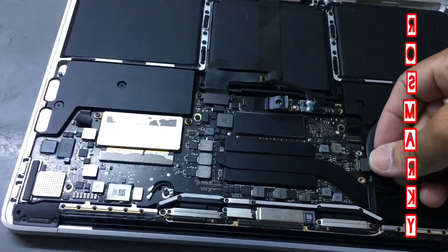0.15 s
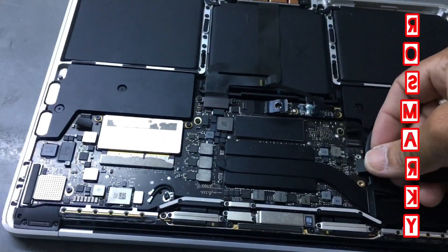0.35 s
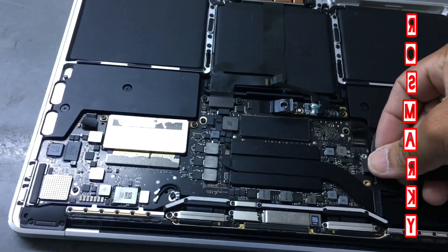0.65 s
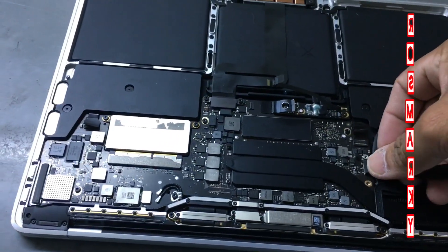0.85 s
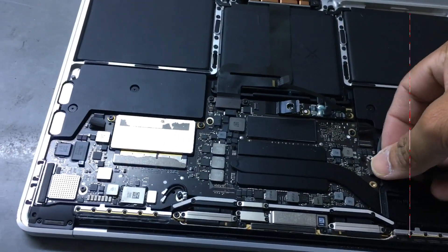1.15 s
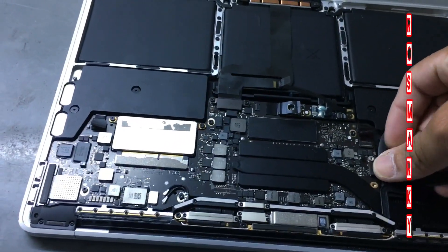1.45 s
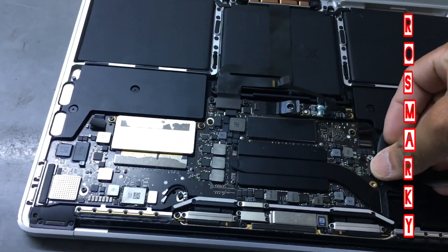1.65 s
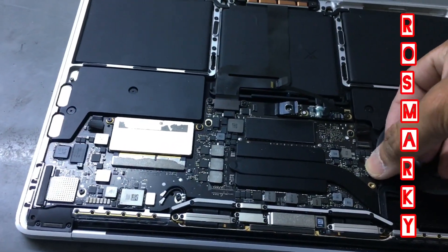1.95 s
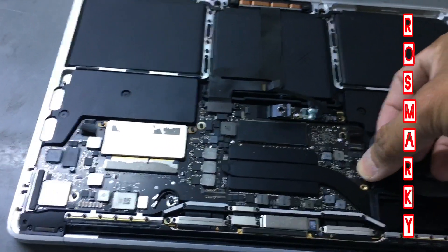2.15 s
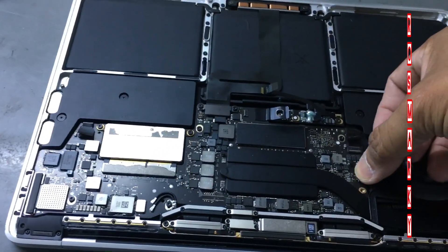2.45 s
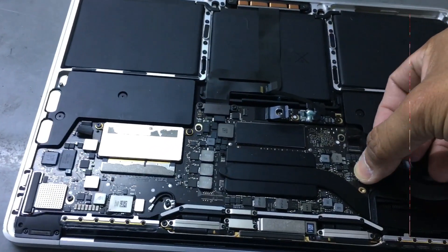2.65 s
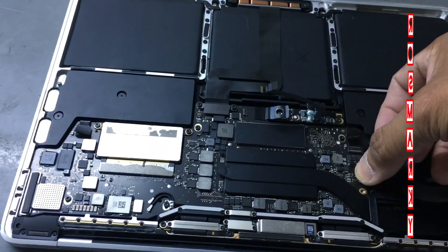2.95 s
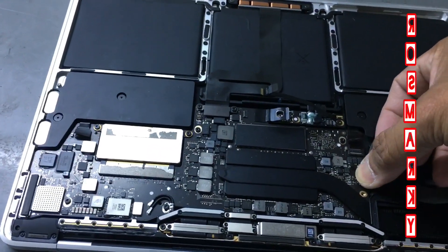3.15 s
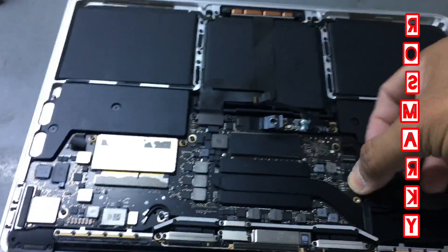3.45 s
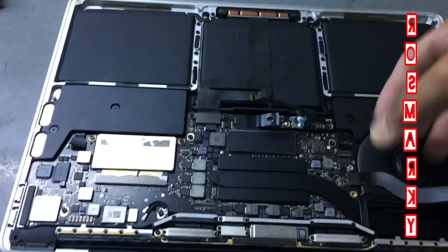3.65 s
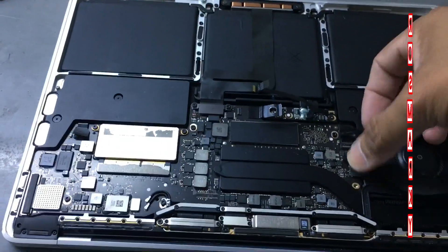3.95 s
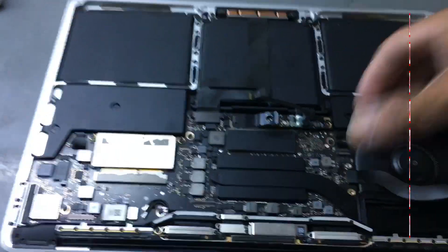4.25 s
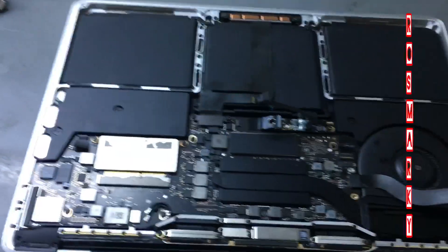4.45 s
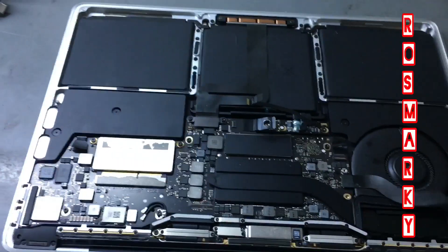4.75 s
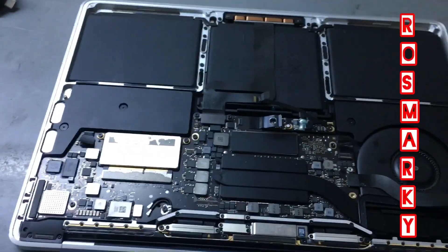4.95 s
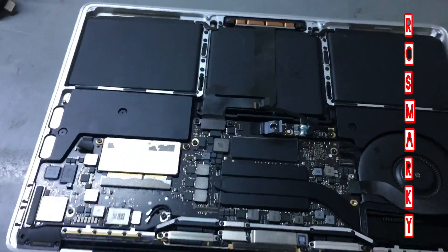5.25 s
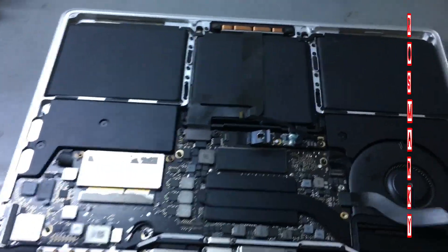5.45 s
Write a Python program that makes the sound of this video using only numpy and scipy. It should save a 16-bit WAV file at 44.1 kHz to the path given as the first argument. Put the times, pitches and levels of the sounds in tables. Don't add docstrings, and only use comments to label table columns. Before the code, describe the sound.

Low motor hum and soft room rumble run steadily in a workshop with a short, faint echo. Close up, skin hisses on a cable and its edge flicks against plastic, busiest shortly after one second. After near stillness, one crisp snap rings the case and bench. Dull taps, short scrapes and small squeaks follow, then a bright hard click close to the end and faint final ticks.

```python
import sys
import numpy as np
from scipy import signal
from scipy.fft import rfft, irfft, next_fast_len
from scipy.io import wavfile
from scipy.ndimage import uniform_filter1d, map_coordinates

SR = 44100
rng = np.random.default_rng(int(sys.argv[2]) if len(sys.argv) > 2 else 0)


def materialize(psi):
    bounded = np.clip(np.atleast_2d(psi).T, -1, 1)
    quanta = np.round(bounded * 32767).astype(np.int16)
    wavfile.write(sys.argv[1], SR, quanta)


def volts(x):
    e = np.asarray(x, float) / 20
    return 10 ** e


N = 246166
TOP_HZ = 16050


def unit(x):
    return x / np.sqrt(np.mean(x ** 2) + 1e-20)


def along(points, hz):
    f, v = np.transpose(points)
    return np.interp(np.log(hz + 1), np.log(f + 1), v)


def wobble(rate_hz):
    knots = rng.standard_normal(int(N * rate_hz / SR) + 4)
    return map_coordinates(knots, [np.arange(N) * rate_hz / SR])


def filtered(x, response):
    m = next_fast_len(x.shape[-1] + 8192)
    spectrum = rfft(x, m) * response(np.fft.rfftfreq(m, 1 / SR))
    return irfft(spectrum, m)[..., :x.shape[-1]]


def modes(table):
    def response(f):
        total = 0
        for k, (hz, width_hz, db) in enumerate(table):
            damping = 1j * f * width_hz
            total = total + (-1) ** k * volts(db) * damping / (hz * hz - f * f + damping)
        return total
    return response


def add(track, start_s, sound):
    part = track[round(start_s * SR):][:len(sound)]
    part += sound[:len(part)]


# (time [s], push [dB], crack [dB])
SNAP = [
    (3.1131, -25, -41),
    (3.1174, -7.5, -10.5),
    (3.1214, -28, -27),
    (3.1215, -26, -27),
    (3.1242, -26, -30),
    (3.128, -44, -38.5),
]
# (frequency [Hz], level [dB], t60 [s])
CASE = [(82, -26.5, 0.67), (102.6, -27, 0.53), (220, -31, 0.077), (296, -29, 0.14), (467, -19.5, 0.042),
        (790, -12, 0.0093), (998, -8.5, 0.027), (1220, 6, 0.0078), (1470, -6, 0.009), (2060, 1.5, 0.0053),
        (2440, -10, 0.0066), (3510, -4.5, 0.0051), (3840, -5.5, 0.0049), (5070, -19.5, 0.023)]
# (frequency [Hz], width [Hz], level [dB])
LATCH = [(3550, 1500, -13), (8600, 2000, -3.5), (12600, 4000, -8.5)]


def snap():
    out, t = np.zeros(N), np.arange(SR // 2) / SR
    rise_s = 0.00035
    for s, push_db, crack_db in SNAP:
        ring = np.zeros(len(t))
        for hz, db, t60_s in CASE:
            ring += volts(db + rng.normal(0, 1) - 60 * t / t60_s) * np.sin(2 * np.pi * hz * t)
        burst = (t / rise_s) * np.exp(1 - t / rise_s) + volts(-13.0 - 60 * t / 0.024)
        grit = rng.standard_normal(len(t)) * burst
        add(out, s - 0.0006, volts(crack_db + 0.5) * filtered(grit, modes(LATCH)))
        add(out, s, volts(push_db) * ring * (1 - np.exp(-t / 0.00064)))
    return out


# (frequency [Hz], level [dB])
REACH = [(100, -40), (400, 0.5), (900, 3.5), (2000, -1), (2800, -11), (4200, -11.5), (6500, -18),
         (9000, -15), (16000, -23.5)]


def snap_far():
    blow = np.zeros(N)
    blow[round(SNAP[1][0] * SR)] = volts(-2.5)
    return filtered(blow, lambda f: volts(along(REACH, f)))


# (frequency [Hz], width [Hz], level [dB])
FILM = [(5100, 3100, -6), (8250, 250, -5), (10300, 1300, -12.5), (11400, 440, -4), (12500, 530, -11)]


def contact(grit, film_hz, width_hz, broad_db, *bodies):
    def film_response(f):
        broad = volts(broad_db) * abs(modes(FILM)(f))
        bright = abs(modes([(film_hz, width_hz, 0)])(f))
        return np.hypot(broad, bright) * f ** 2 / (3500 ** 2 + f ** 2)

    def radiated(table):
        return lambda f: modes(table)(f) * 1j * f / (500 + 1j * f) / (1 + 1j * f / 5200) ** 2

    sound = unit(filtered(grit, film_response))
    for db, table in bodies:
        sound = sound + volts(db) * unit(filtered(grit, radiated(table)))
    return sound


# (frequency [Hz], width [Hz], level [dB])
BOARD = [(540, 220, 1), (920, 59, 3.5), (1280, 204, 4), (1900, 226, 6.5)]
# (frequency [Hz], width [Hz], level [dB])
SHIELD = [(2490, 300, 8), (3610, 400, 7.5), (4260, 74, 4)]
# (time [s], peak [dB], knock share [dB], brightest [Hz])
FLICKS = [(0.2044, -45, -9, 9220), (0.9023, -44.5, -3, 12900), (1.118, -37.5, -8, 8700),
          (1.124, -27, -13.5, 8600), (1.2075, -33.5, -9, 6350), (1.2366, -29, -11, 12300),
          (1.2407, -26.5, -4, 7400), (1.7, -50, -13, 6320), (1.7472, -34, -14, 9200),
          (1.9328, -43, -17, 9800), (1.9949, -51, -14, 5560), (2.0515, -45, -16, 5170),
          (2.113, -53, -5, 11400), (2.153, -51, -14, 5740), (4.04, -41, -17, 12700),
          (4.4243, -48, -18, 9100), (4.7117, -52, -6, 10960), (4.7554, -50, -4, 6430),
          (4.7663, -23.5, -22, 9500), (4.7707, -22.5, -8, 11400), (4.775, -37, -4, 8500),
          (4.781, -35, -6, 9000), (4.8463, -36.5, -3, 9400), (4.9742, -50.5, -14, 5960),
          (5.1821, -46, -7, 5270), (5.1874, -52, 1, 11000), (5.2919, -52, -7.5, 5400),
          (5.411, -50, -5, 11300), (5.4445, -45, -10, 6750)]
# (time [s], peak [dB], knock share [dB], knock [Hz], case ring [dB])
TAPS = [(0.017, -49, -2, 1190, -8), (0.903, -54.5, 14.5, 2900, -14), (1.297, -45.5, 5.5, 1910, -10),
        (1.451, -42.5, 7.5, 860, -6), (1.5796, -56, 8, 1660, -9), (1.828, -57, 14.5, 1000, 3.5),
        (2.215, -62, 12, 700, -2), (3.493, -61, 0, 2190, -5), (3.5534, -37.5, 0, 1470, -12),
        (3.6264, -41, 9.5, 1560, -12), (4.0081, -55, 21, 940, -12), (4.041, -49, 9, 1080, -15),
        (4.0522, -44.5, 7, 1220, -14), (4.1198, -56, 9, 3420, -17), (4.5328, -67.5, 22, 1230, 9),
        (4.5924, -63, 15, 3200, -12), (4.6565, -60.5, 10.5, 2900, -12), (4.426, -61, 11, 2500, -12),
        (4.769, -46.5, 15.5, 1250, -7), (4.9687, -56, 1.5, 2010, 6), (5.3255, -56, 8.5, 830, -3),
        (5.3871, -54, 7.5, 855, 4), (5.477, -57, 6, 965, -2)]
LOOSE_KNOCK_HZ, SEATED_KNOCK_HZ = 1900, 1320
FLICK_T60_S, FLICK_RING_DB = 0.015, -4.5
TAP_FILM_HZ, TAP_T60_S = 6800, 0.021


def ticks():
    out, t = np.zeros(N), np.arange(SR // 20) / SR
    events = []
    for s, db, knock_db, film_hz in FLICKS:
        knock_hz = LOOSE_KNOCK_HZ if s < SNAP[0][0] else SEATED_KNOCK_HZ
        events.append((s, db, knock_db, knock_hz, film_hz, FLICK_T60_S, FLICK_RING_DB))
    for s, db, knock_db, knock_hz, ring_db in TAPS:
        events.append((s, db, knock_db, knock_hz, TAP_FILM_HZ, TAP_T60_S, ring_db))
    for s, db, knock_db, knock_hz, film_hz, t60_s, ring_db in events:
        grit = rng.standard_normal(len(t)) * volts(-60 * t / max(t60_s, 0.004))
        grit *= 1 - np.exp(-t / 0.00006)
        grit[8:11] += 3.5, -1.5, 0.5
        scale = np.sqrt(np.mean(grit ** 2))
        part = knock_db - 1.0, [(knock_hz, 0.78 * knock_hz, 0)]
        case = knock_db + ring_db, [(480, 80, -2.5), (800, 110, -3), (knock_hz, 90, 0.5)]
        board = knock_db - 16.5, BOARD + SHIELD
        add(out, s, volts(db - 7.5) * scale * contact(grit, film_hz, 900, -0.71, part, case, board))
    return out


# (peak time [s], rise [s], fall [s], hiss [dB], body share [dB])
STROKES = [(0.036, 0.024, 0.043, -56, -1), (0.12, 0.048, 0.15, -59, -3.5), (0.21, .012, 0.079, -58.5, 3),
           (0.338, 0.039, .07, -66, 1), (0.944, 0.036, 0.045, -65, 0), (1.315, 0.058, 0.072, -62, -2),
           (1.455, .03, .02, -61, 3), (1.588, .06, .04, -69, 6), (1.73, .06, .02, -67.5, -3),
           (1.884, 0.061, 0.081, -62, 1), (2.0, 0.023, 0.06, -65, -4.5), (2.356, 0.026, .04, -69, -4),
           (3.497, .015, 0.085, -63.5, 3), (3.61, 0.046, 0.039, -58, -6), (4.24, .04, 0.035, -63, 3.5),
           (4.262, .045, .012, -56, -9), (4.981, .025, .02, -72, -6), (5.349, 0.041, 0.016, -60, -3.5),
           (5.384, 0.028, 0.066, -64.5, -3)]
# (time [s], fall [s], hiss [dB], board share [dB], covers share [dB])
DRAGS = [(1.13, .02, -55.5, -6, -2), (1.141, 0.28, -65.5, 2, -2), (1.239, 0.023, -47.5, -5, 0.5),
         (1.262, 0.044, -60, 1, -4), (1.5, 0.13, -73.5, 6, -1), (1.755, .07, -54.5, -5, -4.5),
         (1.934, 0.068, -62, -15, -18), (2.052, 0.088, -64, -3, -9), (3.559, 0.048, -54.5, -1, -5.5),
         (4.056, 0.006, -62, 4, 4), (4.07, 0.15, -72, 2, 0.5), (4.542, 0.13, -84.5, 18.5, 11),
         (4.772, 0.029, -48, -1.5, -8.5), (4.801, 0.092, -60.5, 1, -8)]
# (time [s], hold [s], hiss [dB], board share [dB], covers share [dB])
SCRAPES = [
    (1.22, 0.022, -50.5, -2, -8.5),
    (1.463, .025, -49, -9, -13),
    (4.266, 0.022, -48.5, -15, -16.5),
    (3.625, 0.016, -52, 1, 0),
    (3.643, 0.041, -44.5, -9.5, -5.5),
]
SHIELD_DB = -5.5
DRAG_RISE_S, SCRAPE_RISE_S, SCRAPE_FALL_S = 0.002, 0.006, 0.01
FADE_DB, BODY_HOLDS = 19, 0.23
SWELL = 1.23
SLIDE_HZ, SLIDE_SCATTER = 8500, 0.05


def rubs():
    out = np.zeros(N)
    strokes = [(s, rise, 0, fall, db, body_db, body_db + SHIELD_DB) for s, rise, fall, db, body_db in STROKES]
    drags = [(s, DRAG_RISE_S, 0, *rest) for s, *rest in DRAGS]
    scrapes = [(s, SCRAPE_RISE_S, hold, SCRAPE_FALL_S, *rest) for s, hold, *rest in SCRAPES]
    for s, rise_s, hold_s, fall_s, db, board_db, shield_db in strokes + drags + scrapes:
        noise = rng.standard_normal((2, SR // 4))
        chance = rng.random(SR // 4)
        t = np.arange(-max(rise_s, 0.002), hold_s + np.clip(fall_s, 0.004, 0.15), 1 / SR)[:SR // 4]
        clumps = np.interp(t, t[::90], noise[1, :len(t[::90])])
        crackles = chance[:len(t)] < 0.012
        grit = noise[0, :len(t)] * volts(2.1 * clumps + 9 * crackles)
        away = np.maximum((t - hold_s) / max(fall_s, 0.004), t / t[0]).clip(0)
        loss_db = FADE_DB * away ** SWELL
        board = board_db + BODY_HOLDS * loss_db, BOARD
        shield = shield_db + BODY_HOLDS * loss_db, SHIELD
        film_hz = SLIDE_HZ * (1 + SLIDE_SCATTER * noise[1, -1])
        sound = contact(grit, film_hz, 900, 0.9, board, shield)
        edge = np.clip(np.minimum(t - t[0], (t[-1] - t) / 2) / 0.0016, 0, 1)
        add(out, max(s + t[0], 0), volts(db - loss_db) * edge * sound)
    return out


def patchy(x, depth_db):
    z = signal.stft(x, nperseg=128)[2]
    field = uniform_filter1d(rng.standard_normal(z.shape), size=3, axis=0)
    field = uniform_filter1d(field, size=7, axis=1)
    gain = volts(depth_db * unit(field))
    return signal.istft(z * gain / np.sqrt(np.mean(gain ** 2)), nperseg=128)[1][:N]


# (time [s], length [s], first [Hz], last
# [Hz], level [dB])
SQUEAKS = [(0.153, 0.046, 903, 760, -58.5), (0.216, 0.036, 957, 524, -56), (0.25, 0.026, 1026, 920, -61),
           (1.1222, 0.0033, 8600, 8100, -31.5), (1.296, 0.0061, 2060, 1880, -46.5),
           (1.474, 0.0088, 1900, 1840, -52), (1.475, 0.025, 3860, 3670, -58),
           (1.495, 0.061, 3670, 3680, -70), (3.634, 0.047, 5700, 5950, -57),
           (3.674, 0.019, 8150, 8230, -40.5), (3.675, 0.0213, 4280, 4350, -50),
           (3.659, 0.023, 2587, 2490, -48), (4.538, 0.0164, 1345, 1180, -56), (4.558, .02, 1075, 1020, -64),
           (4.583, 0.025, 1860, 1820, -60.5), (5.372, 0.024, 5300, 5160, -66.5)]
# (frequency [Hz], level per overtone [dB])
OVERTONES = [(1000, -4), (1300, -9), (2000, -14)]


def squeaks():
    out = np.zeros(N)
    for s, length_s, first_hz, last_hz, db in SQUEAKS:
        u = np.linspace(0, 1, round(length_s * SR))
        shake = np.interp(u, np.linspace(0, 1, num=12), rng.standard_normal(12))
        hz = (first_hz + (last_hz - first_hz) * u) * (1 + 0.0265 * shake)
        turn = 2 * np.pi * np.cumsum(hz) / SR
        step_db = along(OVERTONES, first_hz)
        tone = np.zeros(len(u))
        for k in range(4):
            if (k + 1) * first_hz < TOP_HZ:
                tone += volts(step_db * k) * np.sin((k + 1) * turn)
        add(out, s, volts(db + 2.9 * shake) * np.sqrt(np.sin(np.pi * u).clip(0)) * tone)
    return out


# (frequency [Hz], t60 [s])
SHOP = [(200, 0.56), (1000, 0.44), (3000, 0.48), (8000, 0.34), (16000, 0.18)]


def shop(x):
    hz, t, z = signal.stft(rng.standard_normal(SR // 2), SR, nperseg=256)
    decay = volts(-60 * t / along(SHOP, hz)[:, None])
    tail = signal.istft(z * decay, SR, nperseg=256)[1]
    delayed = np.pad(x, (300, 0))
    return signal.fftconvolve(delayed, tail / np.linalg.norm(tail))[:N]


# (time [s], fundamental level [dB])
HUM = [(0.0, -45), (0.2, -46), (0.79, -45), (1.3, -43.5), (1.85, -45), (2.44, -41.5), (2.52, -43.5),
       (2.67, -41), (2.8, -43.5), (3.28, -43.5), (3.91, -44), (4.01, -41), (4.09, -42.5), (5.3, -45),
       (5.58, -43)]
# (multiple [1], level [dB])
ORDER = [(2, -15.5), (3, -21), (4, -24.5), (5, -28.5)]
# (frequency [Hz], level [dB], blur [Hz])
BUZZ = [
    (363, -67, 0.55),
    (14420, -88, 51),
]
MOTOR_HZ, WAVER_DB = 59.2, 1.6


def motor():
    t = np.arange(N) / SR
    turn = 2 * np.pi * MOTOR_HZ * t
    hum = np.sqrt(2) * volts(np.interp(t, *np.transpose(HUM))) * np.sin(turn)
    for k, db in ORDER:
        level = volts(-41.5 + db + WAVER_DB * wobble(5.7))
        hum += level * np.sin(k * turn + 1.16 * wobble(4.5) + k)
    for hz, db, blur_hz in BUZZ:
        level = np.sqrt(2) * volts(db + WAVER_DB * wobble(4.73))
        hum += level * np.sin(2 * np.pi * np.cumsum(hz + blur_hz * wobble(40)) / SR)
    return hum


# (frequency [Hz], density [dB per Hz])
AIR = [(25, -18), (45, 0), (75, -8), (100, 2), (150, -7.5), (350, -9), (390, -18), (1700, -25.5),
       (2600, -30.5), (4000, -34.5), (8000, -36), (15500, -41), (16300, -30)]


def air():
    noise = filtered(rng.standard_normal(N), lambda f: volts(along(AIR, f)))
    return volts(-54.5 + 0.043 * wobble(6.6)) * unit(noise)


def scene():
    fingers = ticks() + patchy(rubs(), depth_db=2.5)
    hand = fingers + squeaks() + snap()
    hand = hand + volts(-18.5) * shop(fingers) + shop(snap_far())
    bass_cut = lambda f: (1j * f / (45 + 1j * f)) ** 2
    return (filtered(hand, bass_cut) + motor() + air())[None]


def band_limit(x):
    return signal.sosfilt(signal.butter(12, 16680, fs=SR, output="sos"), x)


# (frequency [Hz], width [Hz], level [dB])
PORT = [(4980, 133, -5.5), (7580, 1000, -2.5), (10620, 590, -3)]


def record(dry):
    dips = lambda f: volts(sum(db * np.exp(-((f - hz) / width_hz) ** 2) for hz, width_hz, db in PORT))
    edge = lambda f: volts(-25 * (f > TOP_HZ) - 80 * (f > TOP_HZ + 630))
    mix = filtered(dry, lambda f: dips(f) * edge(f))
    return band_limit(mix)


dry = scene()
out = record(dry)
materialize(out)
```